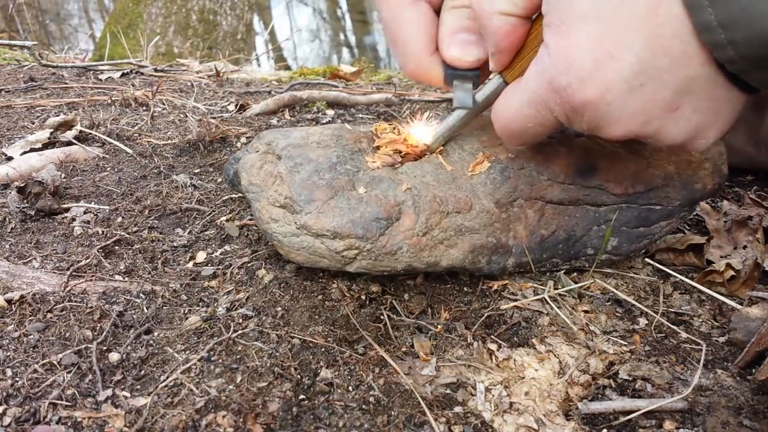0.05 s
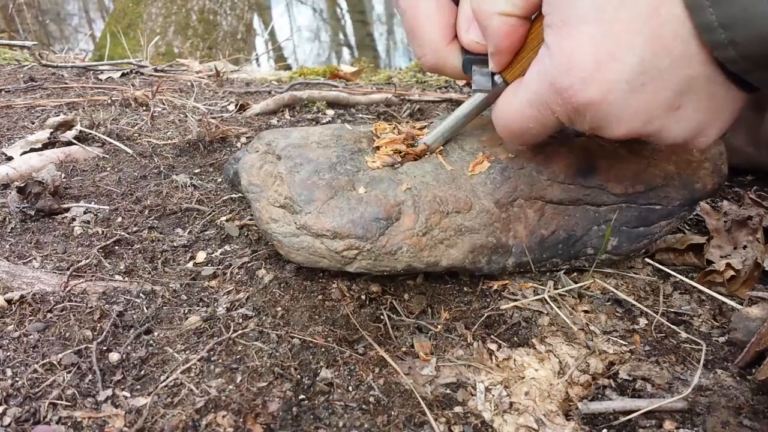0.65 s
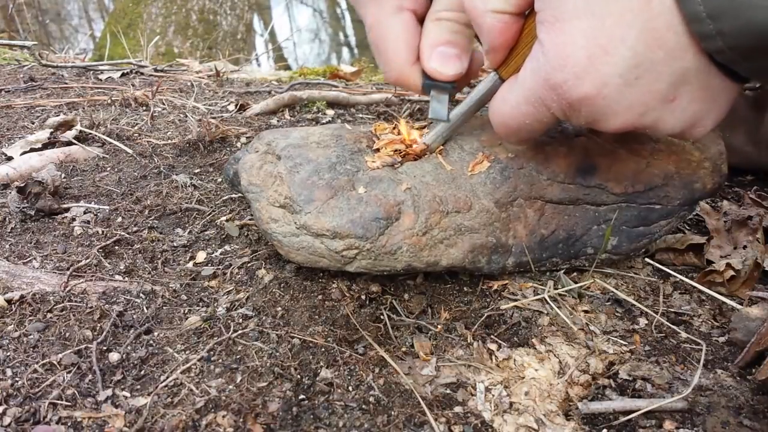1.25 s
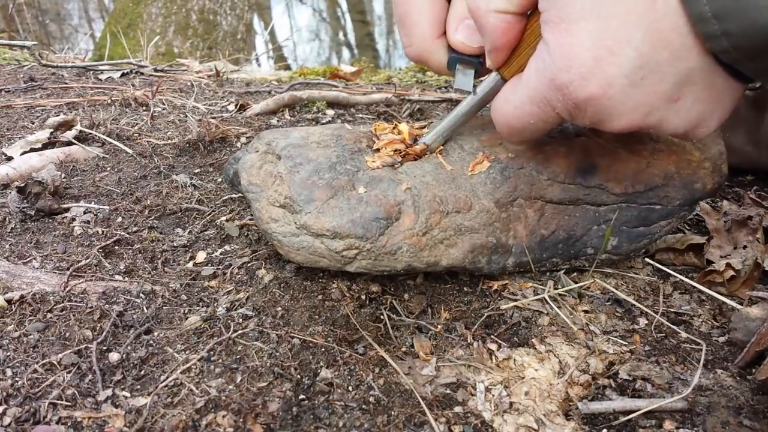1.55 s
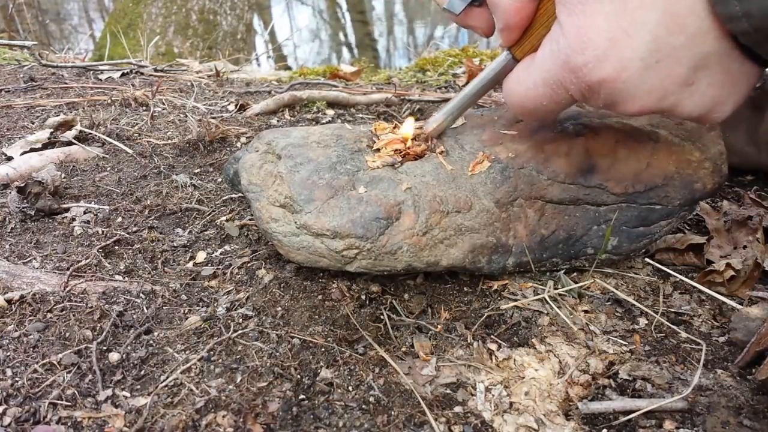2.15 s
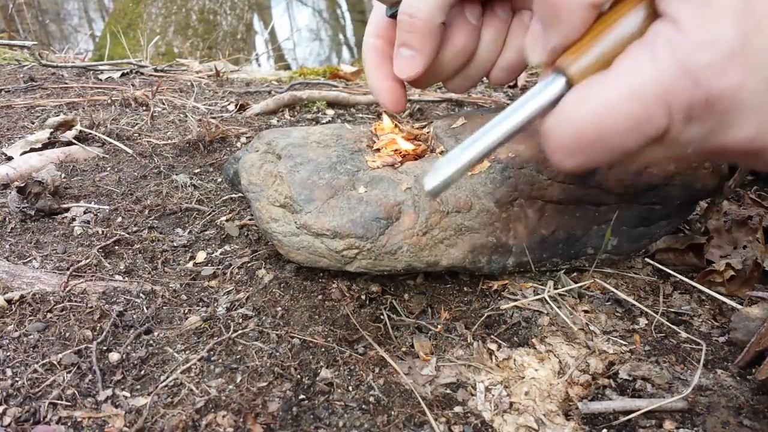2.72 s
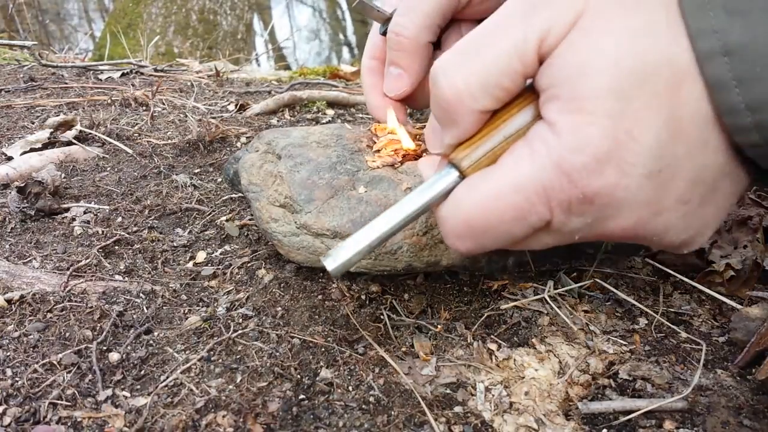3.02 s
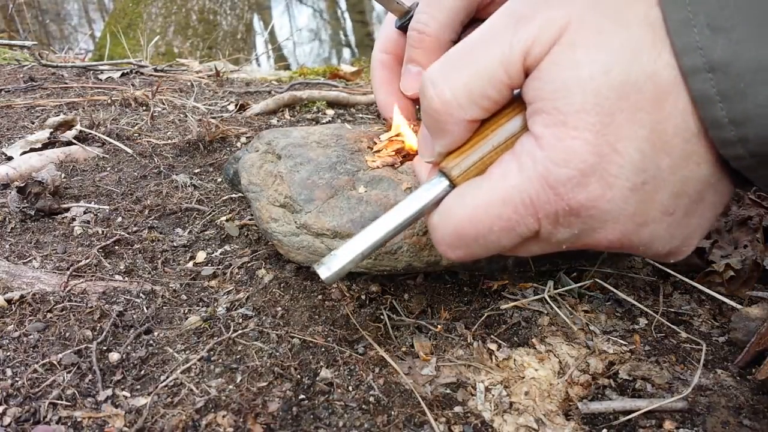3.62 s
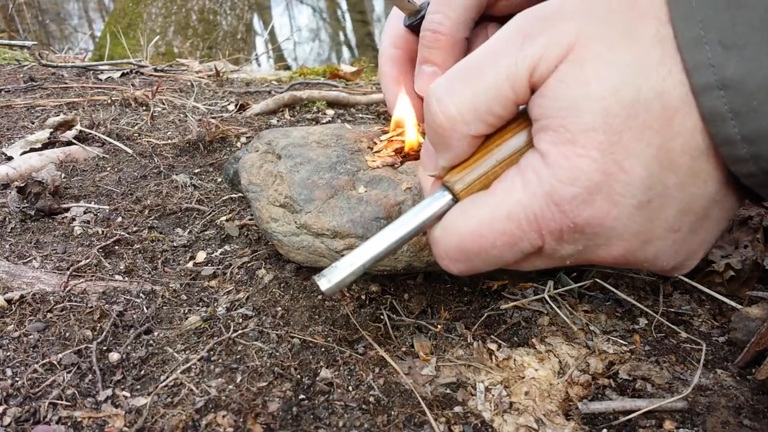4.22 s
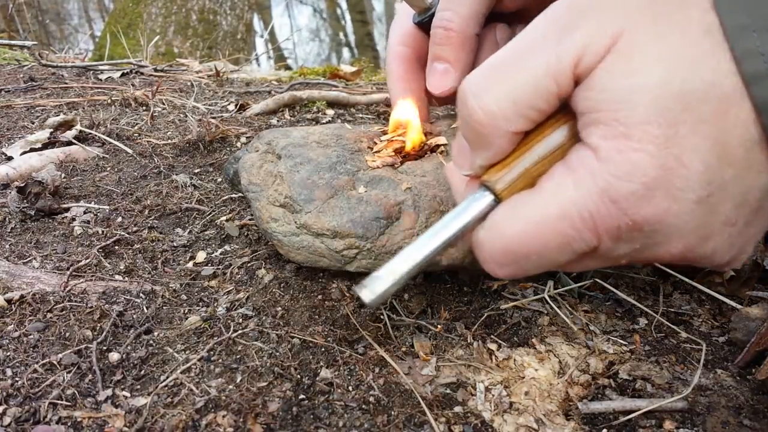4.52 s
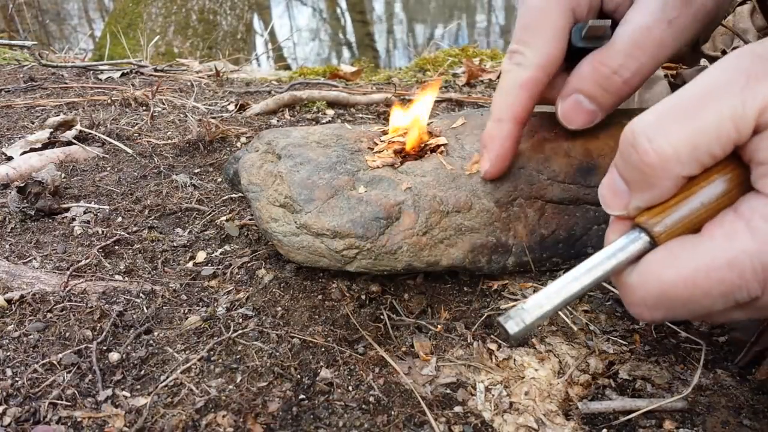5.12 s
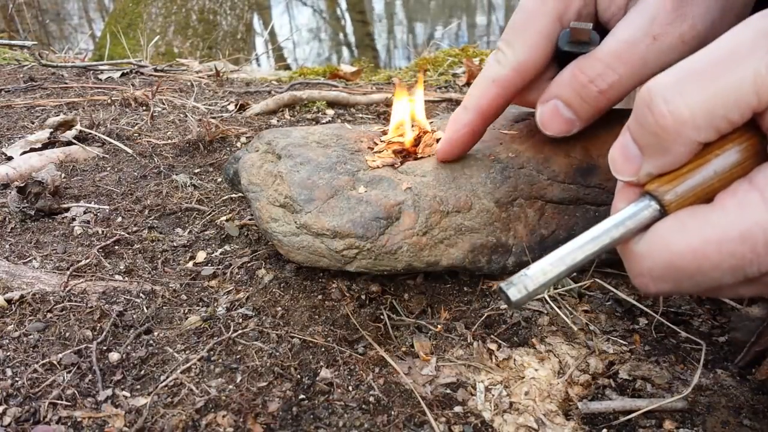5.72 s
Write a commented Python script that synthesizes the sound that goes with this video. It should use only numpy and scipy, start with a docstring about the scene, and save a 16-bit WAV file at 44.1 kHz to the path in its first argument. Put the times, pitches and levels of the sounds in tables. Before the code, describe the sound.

A steel striker rasps down a fire-starting rod, very close, in three short, gritty, spitting strokes: one right at the start, with a dull bump of the stone beneath, and two more at about 0.9 and 1.2 seconds. The rod's tip skids on the stone with sharp, bright ticks and small thuds at about 2.6 and 3 seconds, then gives a quick, loud clatter of clicks around 4.2 seconds. After that the lit shavings tick very faintly. Sleeves and dry leaves rustle softly as the hands shift, most noticeably from 4.5 to 5.6 seconds, with little dry snaps and a few light finger taps. A distant bird gives thin, high whistles near 2, 4 and 5.3 seconds. A quiet, steady hush of trees continues underneath, with slight low puffs of air on the microphone.

```python
"""A steel striker rasps sparks off a ferro rod, three strokes, to light tinder on a stone in a wood.
The rod's tip knocks and skids on the stone and the shavings catch with faint ticks; fingers tap, and
sleeve and dry leaves rustle as the hands shift. Far off, a bird whistles thinly over the hush of trees.
The microphone sits close to the stone: two small ports, each with its own treble resonance."""
import sys
import numpy as np
from scipy import signal
from scipy.fft import rfft, irfft, next_fast_len
from scipy.io import wavfile

SR = 44100
rng = np.random.default_rng(int(sys.argv[2]) if len(sys.argv) > 2 else 0)


def generate_wav(signal):
    """Clip the signal to [-1, 1] and save it as 16-bit WAV at the path in sys.argv[1]."""
    frames = np.transpose(np.atleast_2d(signal))
    scaled = np.clip(frames, -1, 1) * 32767
    pcm = np.round(scaled).astype(np.int16)
    wavfile.write(sys.argv[1], SR, pcm)


N = 258867
TIME = np.arange(N) / SR

# Strokes down the rod, two pushes with a skip between. Each row: start, skip and end in seconds,
# first and second push in dB, gain of the dull crunch in dB.
STROKES = [(-0.03, 0.122, 0.2, -39, -34.5, 1), (0.848, 0.958, 1.018, -27.5, -33.5, -39),
           (1.136, 1.201, 1.2086, -30.5, -28.5, -19)]
# The edge catches and tears off a larger chip. Each row: time in seconds, level in dB.
CATCHES = [(0.0294, -24), (0.1426, -17), (0.1496, -14), (0.1705, -16), (0.1954, -20), (0.2944, -33),
           (0.2977, -31), (0.3287, -31), (0.9084, -15), (0.9344, -15), (0.9617, -20), (1.0211, -18),
           (1.0354, -20), (1.0494, -23), (1.2264, -18), (1.2914, -23), (1.3304, -32), (1.3359, -27),
           (1.3952, -30)]
# The striker drags lightly on its way back up. Each row: time in seconds, level in dB.
RETURN_DRAGS = [(0.335, -43), (1.281, -41.5), (1.338, -49.5)]
# Tone of steel rasping the rod. Each row: frequency in Hz, gain in dB.
RASP_TONE = [(60, -13.5), (190, -8.5), (350, -6.5), (720, -8.5), (1000, -7.5), (1300, -2.5), (1560, -5),
             (1820, -3), (2200, -6.5), (3400, -1.5), (4100, 1.5), (4700, -2.5), (5600, 0), (7000, -2),
             (10000, -2), (14000, -3.5)]
# Tone of the trees all round. Each row: frequency in Hz, gain in dB.
FOREST_TONE = [(20, -35), (45, -1), (75, 7.5), (115, 12.5), (190, 4), (380, -2), (700, -1.5), (1500, -7),
               (3000, -10), (5000, -14), (7200, -17.5), (14000, -19)]
# Puffs of air on the ports. Each row: start of the hold and its length in seconds, level in dB.
PUFFS = [(0.053, 0.16, -60), (1.033, 0.39, -54), (2.576, 0.35, -59.5), (4.17, 0.065, -61.5),
         (5.097, .45, -60.5)]
# Tone of their rumble. Each row: frequency in Hz, gain in dB.
PUFF_TONE = [(15, -16), (40, -27), (70, -2), (100, -2), (150, -11), (400, -35.5), (1500, -68)]
# A hard push rocks the stone on the soil. Each row: time in seconds, level in dB.
THUMPS = [(0.147, -33), (0.172, -39.5), (2.599, -36), (3.045, -39)]
# Steel knocks once on rod or stone. Each row: time in seconds, tick level in dB, thud level in dB.
KNOCKS = [(0.6463, -34, -61), (2.4776, -25.5, -48), (3.0332, -24, -51), (3.0377, -19, -39),
          (4.1527, -19, -39), (4.1992, -6.5, -38), (4.2165, -27, -56), (4.2283, -23, -58),
          (4.2359, -12.5, -40), (4.2459, -7.5, -36.5), (4.2567, -9, -35.5), (4.2708, -18.5, -49)]
# Steel skids in a quick run of slips. Each row: start, length and gap between slips in seconds,
# tick level, thud level and fade over the skid in dB.
SKIDS = [(0.6035, 0.0054, .0016, -23, -43.5, -1.5), (2.5996, 0.013, 0.0043, -6, -33, 7),
         (3.046, 0.0086, .0016, -4.5, -26, 6), (4.158, 0.031, 0.0046, -6.5, -37.5, 6)]
# Tone of the tip ticking on stone. Each row: frequency in Hz, gain in dB.
TIP_TONE = [(40, -43), (200, -34), (900, -31), (2300, -17), (3300, -16), (3750, -13), (4700, -8),
            (5400, 2.5), (6000, -3.5), (6800, -3), (8300, -10), (10600, -6), (12500, -12), (14500, -12)]
# Dull modes of rod and stone. Each row: frequency in Hz, gain in dB, seconds to die by 60 dB.
BODY_MODES = [(197, -18.5, 0.033), (266, -18, 0.065), (520, -11, 0.017), (810, -11, 0.014),
              (1350, 2, 0.011), (1450, -27, 0.015), (1820, -20, 0.027)]
# The hands brush sleeve and leaves. Each row: start of the hold, its length and rise time per 20 dB
# in seconds, level in dB. A negative rise gives a weaker, pointed swell inside the hold.
HAND_MOVES = [(1.395, 0.032, 0.65, -64), (2.18, 0.19, -0.15, -62), (2.606, 0.094, 0.23, -57.5),
              (2.839, 0.016, .045, -52.5), (2.912, 0.3, -0.03, -61.5), (4.9, 0.13, 0.28, -50.5),
              (5.264, 0.04, 0.7, -56.5)]
# Dry leaves and twigs snap. Each row: time in seconds, level in dB, lean to the left in dB.
SNAPS = [(4.5206, -41, -0.5), (4.6528, -36, 0.0), (4.8504, -31, -2.0), (4.9307, -29, -1.0),
         (4.9514, -30, -0.5), (5.1734, -28, -1.5), (5.245, -33, 0.0), (5.4041, -29, 0.0),
         (5.4331, -29, -2.0), (5.5164, -37, -0.5), (5.5817, -39, 0.0), (5.6126, -39, -5.5)]
# Tone of cloth and leaf litter. Each row: frequency in Hz, gain in dB.
RUSTLE_TONE = [(50, -7), (160, 6), (300, 4), (600, 2.5), (1200, 2.5), (1550, 2.5), (1900, -4), (2300, 1.5),
               (4000, -1.5), (5200, -2), (7000, -2.5), (9000, -1), (14000, -5)]
# The far bird's glides. Each row: start and length in seconds, loudest point as a share of the length,
# pitch in Hz at the start, loudest point and end, level in dB.
WHISTLES = [(1.87, .27, .68, 6450, 7880, 8250, -58.5), (2.175, .2, .15, 6900, 7000, 6980, -59.5),
            (3.93, .19, .7, 6840, 6900, 6930, -70), (3.98, .145, .65, 7000, 7850, 8600, -63.5),
            (5.255, .055, .4, 5150, 5550, 4970, -52)]
# Fingers tap on tool and tinder. Each row: time in seconds, level in dB, pitch in Hz.
TAPS = [(2.165, -27, 1800), (3.225, -39.5, 725), (4.654, -29.5, 2650), (4.986, -27, 840),
        (5.245, -38, 1890)]
# Response of the left microphone port. Each row: frequency in Hz, gain in dB.
LEFT_PORT = [(300, 0), (2000, 0), (3600, -2), (5000, 1), (5800, 6), (7000, 0), (8200, -6), (9500, -12),
             (11300, -17), (14500, -16)]
# Response of the brighter right port. Each row: frequency in Hz, gain in dB.
RIGHT_PORT = [(300, 0), (2000, -1), (3500, 0), (5000, 4), (6100, 11), (7200, 15), (8100, 9), (9200, 3),
              (10600, 3), (11700, -2), (14300, 0)]


def from_db(db):
    return 10 ** (np.asarray(db) / 20)


def unit_rms(x):
    return x / np.sqrt(np.mean(x ** 2) + 1e-20)


def drift(rate_hz):
    """A random wander with rms 1, mostly slower than rate_hz."""
    pole = np.exp(-40 * np.pi * rate_hz / SR)   # runs at a twentieth of the sample rate
    slow = signal.lfilter([1], [1, -2 * pole, pole * pole], rng.standard_normal(N // 20 + 2002))[2000:]
    return np.interp(np.arange(N) / 20, np.arange(len(slow)), unit_rms(slow))


def swell(start, hold_s, rise_s, fall_s):
    """Gain 1 through the hold, sloping 20 dB per rise_s before it and per fall_s after."""
    away = np.maximum((start - TIME) / rise_s, (TIME - start - hold_s) / fall_s)
    return from_db(-20 * np.clip(away, 0, 10))


def colour(x, tone):
    """Minimum-phase filter that follows a table of frequency and gain."""
    size = 2 * next_fast_len(N // 2 + SR // 10)
    hz, db = np.transpose(tone)
    grid = np.maximum(np.arange(size // 2 + 1) * SR / size, 1)
    cepstrum = irfft(np.log(from_db(np.interp(np.log(grid), np.log(hz), db))))
    cepstrum[1:size // 2] *= 2
    cepstrum[size // 2 + 1:] = 0
    return irfft(rfft(x, size) * np.exp(rfft(cepstrum)))[..., :N]


def ring(clicks, hz, t60):
    """One mode: each click sets off a cosine that dies by 60 dB in t60 seconds."""
    pole, angle = from_db(-60 / (t60 * SR)), 2 * np.pi * hz / SR
    return signal.lfilter([.5, 0, -.5], [1, -2 * pole * np.cos(angle), pole * pole], clicks + 1e-18)


def contacts(times, db, grit, grit_t60):
    """Each contact is one sharp impulse and a short crunch of grit."""
    out, t = np.zeros(N + SR), np.arange(SR // 20) / SR
    pulses = rng.standard_normal((len(times), len(t))) * from_db(-60 * t / grit_t60) * grit
    pulses[:, 0] = 1
    for start, gain, pulse in zip(times, from_db(db), pulses):
        out[int(start * SR):int(start * SR) + len(t)] += gain * pulse
    return out[:N]


def grains(per_s, spread_db):
    """Random tiny fractures, a few much larger than the rest; rms 1."""
    sizes = from_db(spread_db * np.minimum(rng.exponential(1, N), 4)) * rng.choice([-1, 1], N)
    return unit_rms(sizes * (rng.random(N) < per_s / SR))


def to_ports(x, near_db=(-6, -15), near_t60=.007, far_db=-28, far_t60=.12, left_lag_s=.00006):
    """Sound reaches the right port first; hands and stone scatter it, the surroundings add a tail."""
    t = np.arange(SR // 4) / SR

    def scatter(t60):
        echoes = rng.standard_normal((2, len(t))) * from_db(-60 * t / t60) * (t > .0004)
        return unit_rms(echoes) / np.sqrt(len(t))

    direct = np.sinc((t - np.array([[left_lag_s], [0]])) * SR) * (t < .0005)
    paths = direct + from_db(near_db)[:, None] * scatter(near_t60) + from_db(far_db) * scatter(far_t60)
    return signal.oaconvolve(x[None], paths, axes=1)[:, :N]


def stroke_pressure(start, skip, end, first_db, second_db, skip_s=.0095, release_s=.047):
    """The edge bites, the hand leans in, the edge skips, a second push follows and lets go."""
    push = np.interp(TIME, [skip - skip_s, skip + skip_s], [first_db, second_db])
    bite = np.interp(TIME, [start, start + .007], [-8.5, 0])
    lean = np.interp(TIME, [start, start + .033], [-12, 0])
    sag = np.interp(TIME, [skip - 2 * skip_s, skip, skip + 2 * skip_s], [0, -7.5, 0])
    release = np.interp(TIME, [end, end + release_s], [0, -12.5])
    trail = -172 * np.clip(TIME - end - release_s, 0, 1)   # dB per second
    return from_db(push + bite + lean + sag + release + trail) * (TIME > start)


def along_rod(x, round_trip_s=.0009, wander_s=.00016, echo_db=-7):
    """Vibration returns from the rod's end; the delay wanders as the edge travels, shifting the tone."""
    lag_s = round_trip_s + wander_s * drift(10)
    echo = from_db(echo_db) * np.interp(TIME - lag_s, TIME, x)
    return (x + echo) / np.hypot(1, from_db(echo_db))


def striker(chatter_db=3, catch_db=9, spark_db=-3, dull_hz=1600):
    """Close up, the chattering edge tears chips off the rod; propped hard on the stone, it crunches."""
    pressure = sum(stroke_pressure(*stroke[:-1]) for stroke in STROKES)
    pressure += sum(from_db(db) * swell(start, 0, .0095, .057) for start, db in RETURN_DRAGS)
    pressure *= from_db(chatter_db * drift(200))
    times, db = np.transpose(CATCHES)
    catches = contacts(times, db + catch_db, grit=.22, grit_t60=.005)
    chips = grains(per_s=10000, spread_db=2.5) + from_db(-5) * grains(per_s=250, spread_db=1.5)
    tearing = along_rod(pressure * chips) + catches
    starts, *_, crunch_db = np.transpose(STROKES)
    propped = from_db(crunch_db)[np.searchsorted(starts[1:], TIME)]
    crunch = signal.lfilter(*signal.butter(1, dull_hz, fs=SR), propped * tearing)
    # sparks spit in all directions, so each port hears its own
    sparks = np.array([along_rod(grains(per_s=9000, spread_db=3)) for port in range(2)])
    spitting = from_db(spark_db) * pressure * sparks
    return colour(to_ports(tearing + crunch) + spitting, RASP_TONE)


def forest_hush(left_db=-58, right_db=-60, bass_side_db=-8, shared_below_hz=900):
    """Trees all round: a steady hush, alike at both ports in the bass and unrelated in the treble."""
    mid, side = rng.standard_normal((2, N))
    side_bass = signal.lfilter(*signal.butter(1, shared_below_hz, fs=SR), side)
    side -= (1 - from_db(bass_side_db)) * side_bass
    hush = colour(np.array([mid + side, mid - side]), FOREST_TONE)
    return unit_rms(hush) * from_db([[left_db], [right_db]])


def air_puffs(rise_s=.38, fall_s=.64, side_db=-14):
    """Light puffs of air rumble right on the ports."""
    mid, side = unit_rms(colour(rng.standard_normal((2, N)), PUFF_TONE))
    strength = sum(from_db(db) * swell(start, hold_s, rise_s, fall_s) for start, hold_s, db in PUFFS)
    return strength * (mid + from_db(side_db) * side * [[1], [-1]])


def stone_on_soil():
    """The stone rocks under the hardest pushes with a short, low thump."""
    times, db = np.transpose(THUMPS)
    return to_ports(ring(contacts(times, db, grit=0, grit_t60=1), hz=202, t60=.043))


def slips(start, length_s, gap_s, tick_db, thud_db, fade_db, jitter_s=.0003, spread_db=1.5):
    """One skid as rows like KNOCKS: the steel sticks and slips unevenly, each slip rebounding once."""
    late, rebound_late, strength = rng.standard_normal((3, 10))
    after = gap_s * np.arange(10)
    change_db = spread_db * strength - fade_db * after / length_s
    slip = np.transpose([start + after + jitter_s * late, tick_db + change_db, thud_db + change_db])
    rebound = slip + [.0014, -9, -9]   # a moment later, 9 dB softer
    rebound[:, 0] += jitter_s * rebound_late
    return np.vstack([slip[after < length_s], rebound[after < length_s]])


def rod_on_stone(tick_gain_db=8, thud_gain_db=-3, give=.25, firm_db=-28):
    """Each knock or slip of the tip is a bright tick; the harder ones set rod and stone ringing dully."""
    hits = np.vstack([KNOCKS] + [slips(*skid) for skid in SKIDS])
    hits = hits[np.argsort(hits[:, 0])]
    pauses = np.flatnonzero(np.diff(hits[:, 0]) > .25) + 1
    out = 0
    for spot in np.split(hits, pauses):   # after a pause the tip is on a new spot, with its own echoes
        times, tick_db, thud_db = spot.T
        ticks = colour(contacts(times, tick_db + tick_gain_db, grit=.36, grit_t60=.0045), TIP_TONE)
        give_db = np.minimum(0, give * (thud_db - firm_db))   # light slips hardly move the heavy stone
        blows = contacts(times, thud_db + give_db + thud_gain_db, grit=.0036, grit_t60=.0016)
        thuds = sum(from_db(db) * ring(blows, hz, t60) for hz, db, t60 in BODY_MODES)
        out += to_ports(ticks + thuds, near_db=(-5, -15), far_db=-26)
    return out


def sleeve_and_leaves(left_db=8, right_db=1.5, crumple_db=1.95, snap_db=7.5, snap_left_db=1.5):
    """Cloth and leaf litter rub round the microphone, mostly on its left; now and then a dry snap."""
    motion = sum(from_db(db) * swell(start, hold_s, rise_s, fall_s=1.7 * rise_s)
                 for start, hold_s, rise_s, db in HAND_MOVES)
    motion *= from_db(crumple_db * drift(20))
    rub = np.array([grains(per_s=14000, spread_db=4) + from_db(-3.5) * grains(per_s=450, spread_db=5)
                    for port in range(2)])
    rub[0] += from_db(-36) * ring(rub[0], hz=1870, t60=.054)   # a faint pitch on the left
    times, db, pan_db = np.transpose(SNAPS)
    lean_db = (pan_db + snap_left_db) / 2
    snaps = np.array([contacts(times, db + snap_db + side * lean_db, grit=.24, grit_t60=.014)
                      for side in (1, -1)])
    return colour(from_db([[left_db], [right_db]]) * motion * rub + snaps, RUSTLE_TONE)


def bird(gain_db=-4.5, waver_hz=45, flutter_db=2.5, edge_db=-9):
    """Far off, thin and slightly unsteady glides swell, fade and echo among the trees."""
    song, waver = np.zeros(N), waver_hz * drift(91)
    for start, length_s, loudest, start_hz, loud_hz, end_hz, db in WHISTLES:
        during = (TIME > start) & (TIME < start + length_s)
        along = (TIME[during] - start) / length_s
        pitch = np.interp(along, [0, loudest, 1], [start_hz, loud_hz, end_hz]) + waver[during]
        gain = from_db(db + np.interp(along, [0, loudest, 1], [edge_db, 0, edge_db]))
        song[during] += gain * np.sin(2 * np.pi * np.cumsum(pitch) / SR)
    return to_ports(song * from_db(gain_db + flutter_db * drift(40)), far_db=-7, far_t60=.3)


def fingers(gain_db=-5.5, cycles=9):
    """Soft, gritty taps on tool and tinder that die within a few cycles."""
    taps = sum(ring(contacts([start], [db + gain_db], grit=.12, grit_t60=.004), hz, cycles / hz)
               for start, db, hz in TAPS)
    return to_ports(taps)


def tinder(lit_s=4.1, per_s=9, crackle_db=-52, spread_db=4):
    """Once the shavings on the stone have caught, they tick faintly at random."""
    times = rng.uniform(lit_s, N / SR, int(per_s * (N / SR - lit_s)))
    db = crackle_db + spread_db * rng.standard_normal(len(times))
    return to_ports(contacts(times, db, grit=.39, grit_t60=.0093))


def scene():
    """The close work at the stone and the wood behind it, as they arrive at the two ports."""
    close = striker() + rod_on_stone() + stone_on_soil() + tinder() + fingers() + sleeve_and_leaves()
    return close + bird() + forest_hush() + air_puffs()


def record(dry, self_noise_db=-68, ceiling=.6, cutoff_hz=14500):
    """Each port rings in the treble; the recorder adds a little hiss, rounds peaks and cuts the top."""
    ports = np.array([colour(dry[0], LEFT_PORT), colour(dry[1], RIGHT_PORT)])
    hiss = from_db(self_noise_db) * rng.standard_normal((2, N))
    rounded = ceiling * np.tanh((ports + hiss) / ceiling)
    return signal.sosfilt(signal.ellip(10, .2, 70, cutoff_hz, fs=SR, output="sos"), rounded)


dry = scene()
out = record(dry)
generate_wav(out)
```